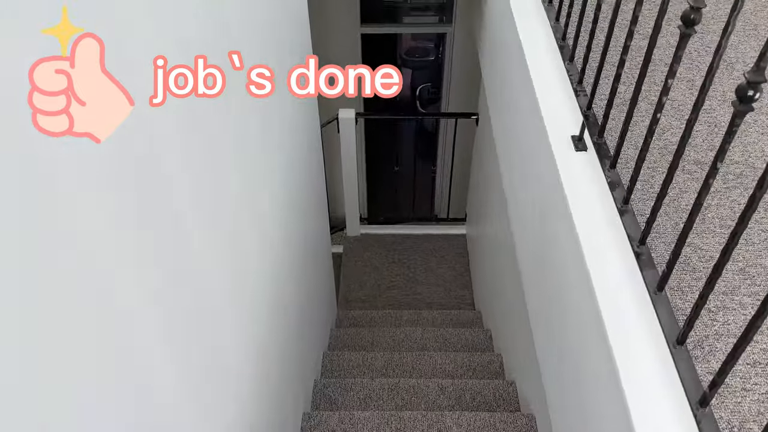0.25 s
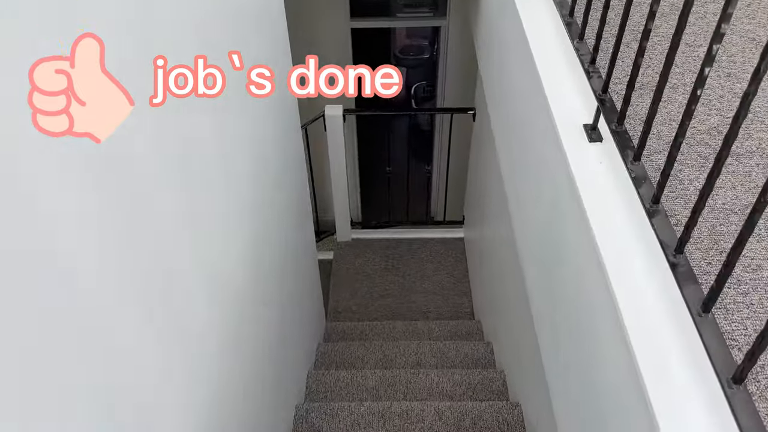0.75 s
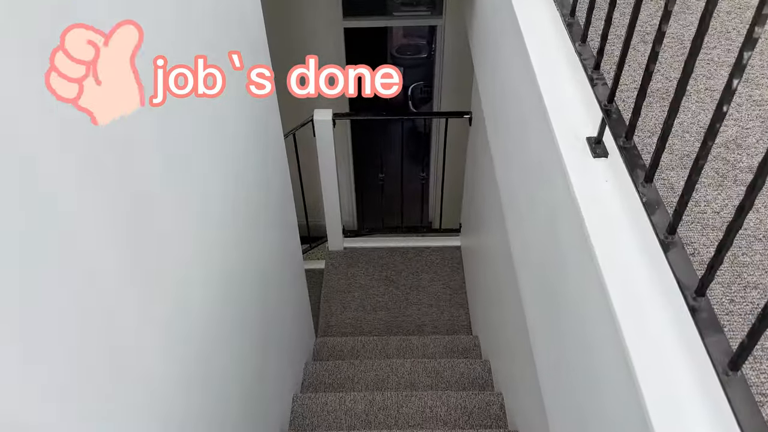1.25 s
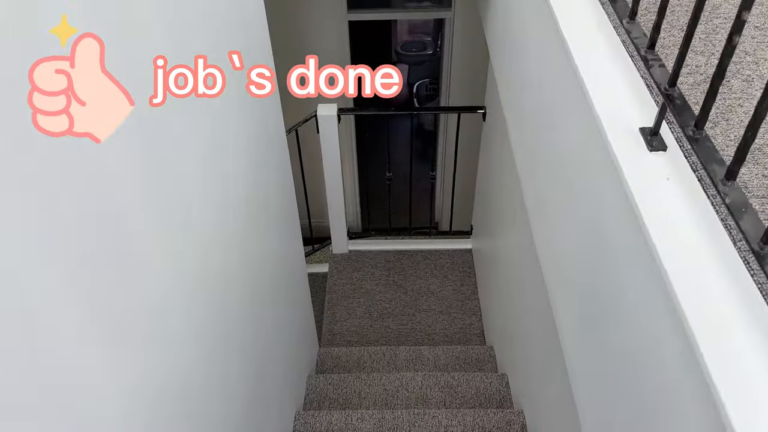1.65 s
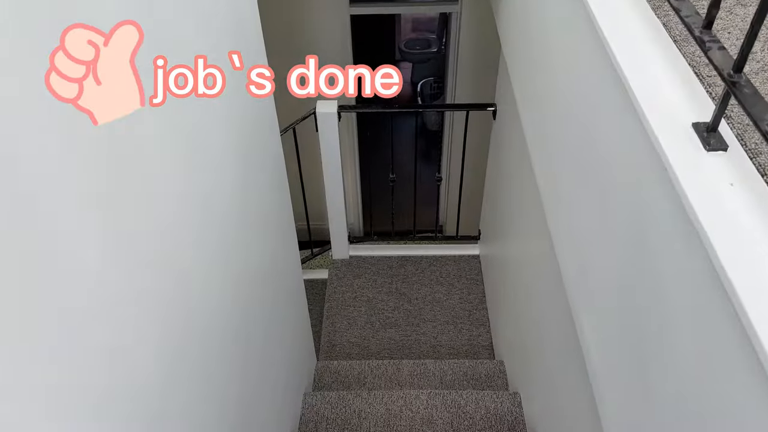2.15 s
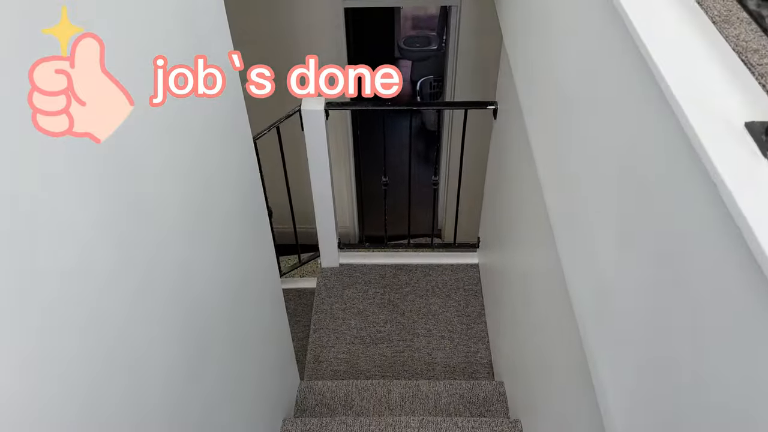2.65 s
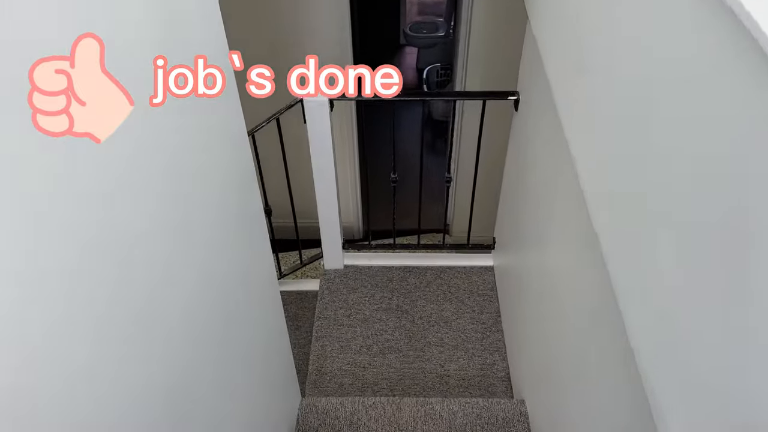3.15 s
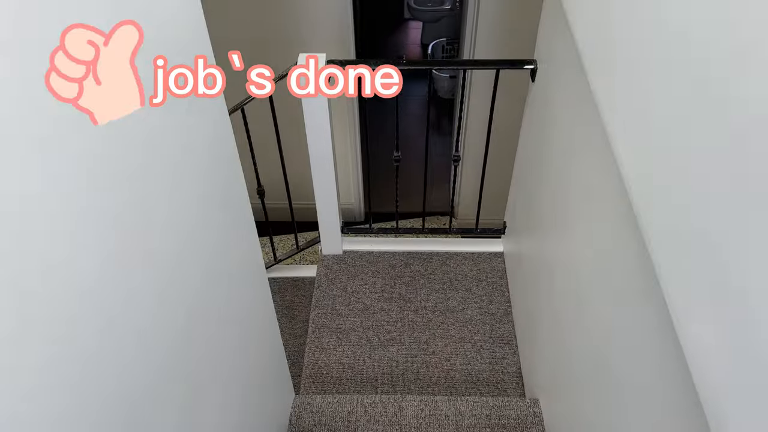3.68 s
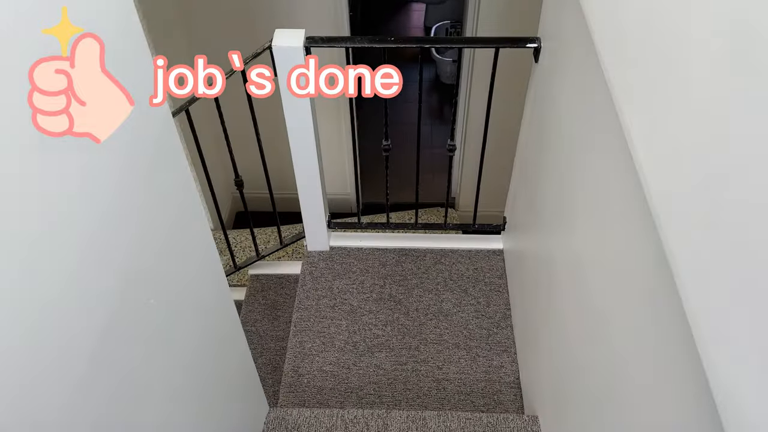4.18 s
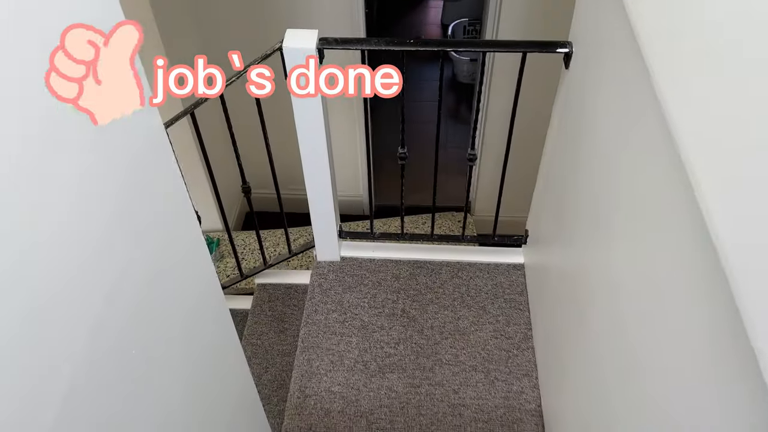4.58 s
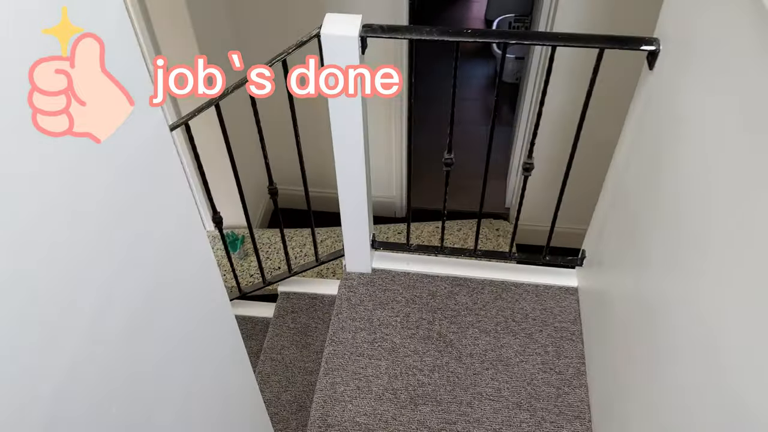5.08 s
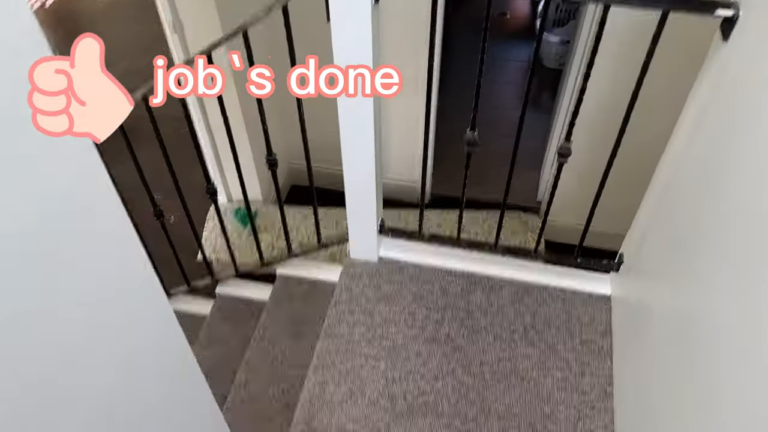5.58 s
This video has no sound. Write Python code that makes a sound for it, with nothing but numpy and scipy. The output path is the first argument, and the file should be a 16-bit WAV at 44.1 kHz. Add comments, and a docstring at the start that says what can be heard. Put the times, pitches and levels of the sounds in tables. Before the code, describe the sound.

Slow shod steps on carpeted stairs in a tight, bare stairwell, heard in stereo from the walker's own position. The first full step is the hardest; a double, dragging one follows in the middle, then softer and firmer thuds alternate. Soles brush the carpet, boards grumble under weight and clothing rustles. The walls add a brief diffuse ring over quiet low house hum, with barely audible thin falling whines.

```python
"""Footsteps go down carpeted wooden stairs in a narrow hard-walled stairwell, heard by the walker.
Each contact is a filtered snap and knock, then a swelling low thud; noise makes the rubs of sole and cloth.
One long drag rasps in a few noise bands, and one tiny tick is a damped tone.
A wavering low hum, three faint falling whines, rumble and hush lie behind; decaying noise makes the echo."""
import sys
import numpy as np
from scipy import signal
from scipy.fft import rfft, irfft, next_fast_len
from scipy.io import wavfile
from scipy.ndimage import map_coordinates

SR = 44100
rng = np.random.default_rng(int(sys.argv[2]) if len(sys.argv) > 2 else 0)


def wav_out(sig):
    """Save sig, one row per channel (or a flat mono array), as 16-bit PCM at SR to the path in sys.argv[1]."""
    wavfile.write(sys.argv[1], SR, np.round(np.clip(np.atleast_2d(sig).T, -1, 1) * 32767).astype(np.int16))


def boost(x):
    """Linear amplitude factor 10**(x/20) for a level x in decibels (scalar or array-like)."""
    u = np.asarray(x, float) / 20
    return 10 ** u


N = 257146  # length in samples


def unit(x):
    """Scales a sound to rms 1."""
    return x / np.sqrt(np.mean(x ** 2) + 1e-20)


def along(points, hz):
    """Reads a curve of (frequency, value) points on a log frequency axis."""
    f, v = np.transpose(points)
    return np.interp(np.log(hz + 1), np.log(f + 1), v)


def curves(rows):
    """Gives one value per sample for each column after the time."""
    s, *columns = np.transpose(rows)
    return [np.interp(np.arange(N) / SR, s, column) for column in columns]


def wobble(rate):
    """Makes a smooth random curve with rate knots a second."""
    knots = rng.standard_normal(int(N * rate / SR) + 4)
    return map_coordinates(knots, [np.arange(N) * rate / SR])


def filtered(x, response):
    """Multiplies the spectrum of x by a complex response of frequency."""
    n = x.shape[-1]
    m = next_fast_len(n + 8192)
    return irfft(rfft(x, m) * response(np.fft.rfftfreq(m, 1 / SR)), m)[..., :n]


def modes(table):
    """Sums resonances (centre [Hz], width [Hz], level [dB]) of alternating sign; each rings after a blow."""
    def response(f):
        total = 0
        for k, (centre, width, db) in enumerate(table):
            resonance = 1j * f * width / (centre * centre - f * f + 1j * f * width)
            total = total + (-1) ** k * boost(db) * resonance
        return total
    return response


def rush(spectrum, grain_db=0):
    """Makes two coloured noises of rms 1, lumpy where fibres catch."""
    lumps = boost(grain_db * wobble(160) + grain_db * wobble(35))
    noise = lumps * rng.standard_normal((2, N))
    return unit(filtered(noise, lambda hz: boost(along(spectrum, hz))))


def tone(hz, db, waver_hz, rough_db, rate):
    """Makes a sine that follows hz and db, unsteady in pitch and size."""
    phase = 2 * np.pi * np.cumsum(hz + waver_hz * wobble(rate)) / SR
    return np.sqrt(2) * boost(db + rough_db * wobble(rate)) * np.sin(phase)


def stroke(start, length, rise, fall_db):
    """Gain that rises over rise seconds and, once length has passed, dies away at fall_db a second."""
    t = np.arange(N) / SR - start
    return np.clip(t / rise, 0, 1) ** 2 * boost(-fall_db * np.clip(t - length, 0, None))


def hush():
    """Even room hush: steady noise with a fixed colour."""
    # colour of the hush: (frequency [Hz], relative level per Hz [dB])
    hush_colour = [(53, -22.5), (90, -2.5), (155, -9), (201, -15), (266, -23), (392, -24), (1350, -54),
                   (2370, -32.5), (3420, -43.5), (6400, -40), (8670, -37), (10100, -67), (11200, -74),
                   (12500, -41), (15900, -54)]
    return boost(-66) * rush(hush_colour)


def rumble():
    """Deep rumble: steady noise, strongest near 64 Hz."""
    # colour of the rumble: (frequency [Hz], relative level per Hz [dB])
    rumble_colour = [(12, -66), (20, -29), (27, -22), (42, -1.5), (64, 9.5), (86, -3), (110, -22),
                     (140, -52), (240, -120)]
    return boost(-57.5) * rush(rumble_colour)


def hum():
    """A low hum near 80 Hz: one wavering sine whose pitch and level drift as the walker descends."""
    # course of the hum: (time [s], pitch [Hz], level [dB])
    hum_course = [(0, 82.5, -60), (.5, 82, -53.5), (1.5, 81.5, -50), (2.4, 81, -51.5), (3.0, 80.04, -58),
                  (3.5, 79, -66), (4.6, 77.32, -62.5), (5.83, 77, -56.5)]
    line = tone(*curves(hum_course), waver_hz=0.67, rough_db=2.0, rate=11)
    return line * [[1], [.3]]  # weaker in the second signal


def whines():
    """Thin, broken far lines near 1 kHz: shaky sines that sink in pitch, faster towards the end."""
    # the three whines: (start [s], length [s], first pitch [Hz], last pitch [Hz], starting level [dB])
    whine_rows = [(2.05, .76, 1215, 1116, -84), (3.171, .3, 1134, 950, -78.5),
                  (3.75, .55, 1231, 1050, -71.5)]
    # level change from start to end of each whine: one value for each [dB]
    whine_fades = (6.5, 0, -15)
    edge_s, sag_curve = .07, 1.5
    t, out = np.arange(N) / SR, 0
    for (s, length, first_hz, last_hz, db), fade_db in zip(whine_rows, whine_fades):
        done = np.clip((t - s) / length, 0, 1)  # share of the whine that is over
        edge = np.clip(np.minimum(done, 1 - done) * length / edge_s, 0, 1)
        hz = first_hz + (last_hz - first_hz) * done ** sag_curve
        out = out + edge * tone(hz, db + fade_db * done, waver_hz=55, rough_db=3.5, rate=110)
    return out


def pip():
    """One tiny pitched tick: a sine that dies away quickly."""
    # the tick: (pitch [Hz], starting level [dB], time to fall by 60 dB [s])
    pip_settings = (1270, -54, .04)
    hz, db, t60 = pip_settings
    t = np.clip(np.arange(N) / SR - 1.8158, 0, None)  # seconds since the tick starts
    return boost(db - 60 * t / t60) * np.sin(2 * np.pi * hz * t)


def slide():
    """The sole drags over the stair's edge: noise through resonances rasps in a few bands."""
    # the drag: (length [s], level [dB], rise [s], fall [dB per s])
    slide_settings = (0.32, -63, 0.2, 84)
    # bands of the rasp, before squaring: (centre [Hz], width [Hz], relative level [dB])
    rasp_bands = [(1100, 320, -1), (2550, 1300, -5.5), (3310, 170, 1.5), (4530, 370, -6), (6000, 1100, -5)]
    length, db, rise, fall_db = slide_settings
    noise = rng.standard_normal((2, N))
    rasp = unit(filtered(noise, lambda hz: modes(rasp_bands)(hz) ** 2))
    return boost(db) * stroke(2.168, length, rise, fall_db) * rasp  # starts at 2.168 s


def stroke_power(kind):
    """Adds up the power of all strokes of the sole; kind is 0 for hiss, 1 for scrape, 2 for load."""
    # strokes over the pile: (start [s], length [s], hiss level [dB], dull scrape level [dB],
    # level of the load on the stair [dB])
    stroke_rows = [(-0.1, .15, -78, -62.5, -54), (0.284, 0.37, -100, -77.5, -59),
                   (0.639, 0.035, -70.5, -64.5, -45), (0.682, 0.033, -62, -57, -59),
                   (0.767, 0.054, -53.5, -49.5, -48.5), (1.526, 0.062, -67, -60, -50.5),
                   (1.583, 0.084, -64.5, -61, -52), (2.165, 0.11, -58, -52, -49.5),
                   (2.316, 0.17, -64.5, -55.5, -45), (2.991, .09, -70, -63.5, -48),
                   (3.101, 0.09, -63.5, -56.5, -58), (3.225, 0.038, -75, -71.5, -64),
                   (3.745, 0.18, -68.5, -63.5, -56.5), (3.892, 0.039, -62.5, -57, -42.5),
                   (3.979, 0.037, -70.5, -61.5, -57), (4.44, .04, -70, -71.5, -55.5),
                   (4.596, 0.15, -58.5, -55, -42), (5.336, 0.021, -64, -58.5, -55),
                   (5.381, 0.088, -65, -66.5, -53), (5.5, .11, -71.5, -64, -59.5)]
    # how fast strokes build: (hiss [s], scrape [s], load [s])
    rise_times = (0.024, 0.016, 0.038)
    # how fast strokes die: (hiss [dB per s], scrape [dB per s], load [dB per s])
    fall_rates = (102, 104, 121)
    # cloth and shifting weight between strokes: (hiss [dB], scrape [dB], load [dB])
    rest_levels = (-81.5, -79.5, -63)
    power = boost(rest_levels[kind]) ** 2
    for s, length, *levels in stroke_rows:
        gain = stroke(s, length, rise_times[kind], fall_rates[kind])
        power = power + (boost(levels[kind]) * gain) ** 2
    return power


def load():
    """The stair grumbles under the shifting weight: lumpy low noise."""
    # colour of the grumble: (frequency [Hz], relative level per Hz [dB])
    load_colour = [(50, -22.5), (85, -4), (167, -8), (242, -13.5), (280, -23), (300, -16), (390, -40),
                   (660, -120)]
    return np.sqrt(stroke_power(2)) * rush(load_colour, grain_db=2.5)


def scrape():
    """The shoe scrapes dully: lumpy noise below about 3.5 kHz."""
    # colour of the scrape: (frequency [Hz], relative level per Hz [dB])
    scrape_colour = [(160, -28), (270, -4.5), (311, -4), (366, -3.5), (417, -3.5), (546, -5), (1020, -10),
                     (1140, -9), (1860, -13.5), (3340, -18), (3600, -44), (4680, -44), (7920, -120)]
    return np.sqrt(stroke_power(1)) * rush(scrape_colour, grain_db=1.5)


def hiss():
    """Pile hisses under the sole and cloth swishes as a leg swings: bright lumpy noise."""
    # colour of pile and cloth: (frequency [Hz], relative level per Hz [dB])
    brush_colour = [(760, -35.5), (1300, -8.5), (1870, -9), (3360, -11.5), (3650, -9), (4490, -10),
                    (5960, -8.5), (7650, -11.5), (8760, -14.5), (10300, -21), (10800, -29), (14000, -31.5),
                    (15700, -29.5)]
    # cloth swishes on the way to the next tread: (middle [s], half length [s], level [dB])
    swing_rows = [(.47, .17, -77), (1.31, .12, -74.5), (2.06, .14, -76), (2.93, .12, -73.5),
                  (3.6, .19, -75.5), (4.4, .08, -75), (5.15, .2, -76)]
    power = stroke_power(0)
    for s, half, db in swing_rows:
        power = power + boost(db) ** 2 * np.exp(-((np.arange(N) / SR - s) / half) ** 2)
    return np.sqrt(power) * rush(brush_colour, grain_db=1.17)


def sweep(f, s):
    """Delays lower tones more, by a fixed time per octave."""
    return np.exp(-2j * np.pi * s * f * (1 + np.log(14000 / (f + 1))))


def snap(t, snap_db):
    """One sharp slip, a little ragged: a click and a short noise burst, brighter for harder snaps."""
    # brightness of a snap: (snap level [dB], centre [Hz])
    snap_pitch = [(-58.5, 1230), (-49, 4100), (-29, 4360)]
    snap_hz = np.interp(snap_db, *np.transpose(snap_pitch))

    def response(f):
        bump = np.exp(-.5 * (np.log(f / snap_hz + 1e-9) / 0.35) ** 2)
        band = 0.34 * f / (f + 1500) + bump
        return band * sweep(f, 0.0017) / (1 + (f / 9500) ** 8)  # the top is cut off

    ragged = 0.24 * rng.standard_normal(len(t)) * np.exp(-t / 0.002)
    return filtered((t == 0) + ragged, response)


def knock(t):
    """The boards ring briefly: a click and a short noise burst strike their resonances."""
    # resonances of the boards: (centre [Hz], width [Hz], relative level [dB])
    board_modes = [(283, 47, 4), (367.5, 83, 0), (529.7, 54, 1), (718, 90, -8), (950, 204, -11.5),
                   (1339, 120, -15.5)]
    ragged = 0.096 * rng.standard_normal(len(t)) * np.exp(-t / 0.0075)
    return filtered((t == 0) + ragged, lambda f: modes(board_modes)(f) * sweep(f, 0.0011))


def thud(t, thud_hz):
    """The tread bounces as weight arrives through the pile: a swelling low tone stirs its resonances."""
    # low resonances of the tread: (centre [Hz], width [Hz], relative level [dB])
    tread_modes = [(77, 12, 3.5), (101.5, 17, 2.5), (148, 25, -18), (169, 23, -11), (198, 17, 0.5),
                   (248, 25, -19)]
    late = .018  # s from contact to the deepest bounce
    swell = (t / late * np.exp(1 - t / late)) ** 9.5
    bounce = -swell * np.cos(2 * np.pi * thud_hz * (t - late))
    return bounce + 0.43 * filtered(bounce, modes(tread_modes))


def steps():
    """A snap in the treble arrives first, the boards knock, and the tread's bounce swells in last."""
    # contacts of foot and tread, levels before the walls and the stereo mix:
    # (time [s], snap peak [dB], knock peak [dB], thud peak [dB], thud pitch [Hz])
    contacts = [(0.4782, -68, -56.5, -45, 99), (0.6535, -84, -66, -51, 81), (0.696, -45, -42.5, -44.5, 132),
                (0.7663, -52, -42.5, -45, 101), (0.7955, -23.5, -28, -23, 159.5),
                (1.484, -58, -60.5, -57, 82), (1.5364, -58, -45, -36.5, 162), (1.627, -50, -54.5, -49, 87),
                (2.172, -77, -44, -69, 86), (2.273, -66, -45.5, -39.5, 126), (2.3448, -42, -40, -58, 109),
                (2.4103, -46.5, -42.5, -32, 95), (2.4582, -30.5, -37.5, -30, 106.7),
                (2.9958, -47.5, -42.5, -31.5, 127), (3.068, -62, -51.5, -51, 106),
                (3.115, -58, -46, -57, 120), (3.7605, -58.5, -57, -43, 150), (3.8342, -62, -76, -34, 84),
                (3.909, -40, -33, -23.5, 116), (4.453, -73, -58, -46.5, 109),
                (4.613, -38.5, -32.5, -29, 109), (4.6447, -60, -36, -33.5, 195),
                (4.7014, -32.5, -30.5, -26.5, 86.36), (5.351, -53, -51.5, -42, 143),
                (5.3849, -46, -40, -33.5, 104), (5.4411, -65, -66, -36.5, 86)]
    out, t = np.zeros(N + SR), np.arange(SR // 3) / SR
    for s, snap_db, knock_db, thud_db, thud_hz in contacts:
        parts = [(snap_db, snap(t, snap_db)), (knock_db, knock(t)), (thud_db, thud(t, thud_hz))]
        for db, part in parts:
            out[round(s * SR):][:len(t)] += boost(db) * part / np.abs(part).max()
    return out[:N]


def stairwell(x):
    """Two unrelated noise tails; each frequency dies at its own speed, drawn anew as the walker moves on."""
    # how long the walls ring: (frequency [Hz], time to fall by 60 dB [s])
    wall_decay = [(100, 0.4), (500, 0.49), (2000, 0.72), (6000, 0.23), (12000, 0.071)]
    out, chunk = np.zeros((2, N + 2 * SR)), SR // 4  # new tails every quarter second
    for start in range(0, N, chunk):
        hz, t, z = signal.stft(rng.standard_normal((2, SR // 2)), SR, nperseg=256)
        fading = z * boost(-60 * t / along(wall_decay, hz)[:, None])
        tail = signal.istft(fading, SR, nperseg=256)[1]
        tail = tail / np.linalg.norm(tail[0])
        wet = signal.fftconvolve(x[None, start:start + chunk], tail, axes=1)
        out[:, start + SR // 200:][:, :wet.shape[1]] += wet  # 5 ms later
    return out[:, :N]


def ports(a, b):
    """Mixes two signals into left and right as two ports some centimetres apart hear the stairwell."""
    # how alike the two sides are: (frequency [Hz], likeness of left and right [1 = same])
    likeness = [(30, 0.94), (80, .99), (160, 0.95), (280, 0.73), (700, 0.51), (1300, 0.049), (2200, 0.63),
                (4000, 0.2), (9000, 0.18), (12000, 0.67)]
    # how far the left side is ahead: (frequency [Hz], phase lead [radians])
    left_lead = [(0, -0.5), (1200, 0.31), (1600, 3), (2500, 6.5), (4390, 6), (5940, 11.5), (8180, 20),
                 (10600, 15), (11500, 17), (15800, 11)]

    def shares(hz):
        turn = np.arccos(np.clip(along(likeness, hz), -1, 1)) / 2
        return np.array([np.cos(turn), np.sin(turn)])

    def lead(hz):
        return np.exp(.5j * along(left_lead, hz) * np.array([[1], [-1]]))

    mid, side = filtered(np.array([a, b]), shares)
    return filtered(np.array([mid + side, mid - side]), lead)


def scene():
    """Direct blows, the near wall's copy and their tails, over rubbing and house sound."""
    # how much of a blow the walls return: (frequency [Hz], level [dB])
    wall_return = [(100, -18), (300, -6), (1000, -7.5), (5000, -11.5)]
    near = steps() + pip()
    returned = filtered(near, lambda hz: boost(along(wall_return, hz)))
    tails = stairwell(returned + whines())  # the whines arrive only by way of the walls
    rubbing = hiss() + scrape() + load() + slide()
    house = hum() + rumble() + hush()
    a, b = tails + rubbing + house
    wall = np.pad(near, (SR // 700, 0))[:N]  # reaches the ports from the side, a moment later
    return ports(a + near, b + 0.57 * wall)


def band_limit(x):
    """A steep low-pass at the top of the band."""
    return signal.sosfilt(signal.butter(12, 16240, fs=SR, output="sos"), x)


def record(dry):
    """Turns the finished mix into the final sound."""
    return band_limit(dry)


dry = scene()
out = record(dry)
wav_out(out)
```